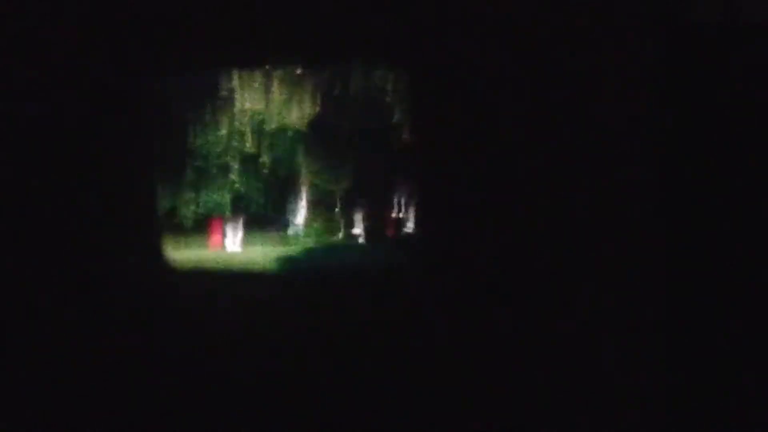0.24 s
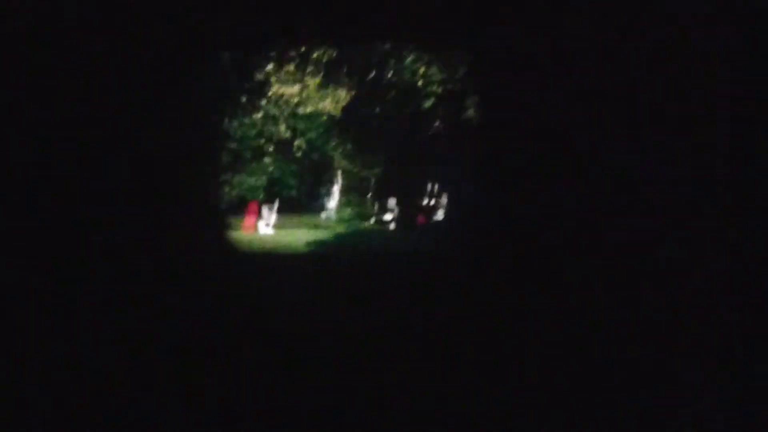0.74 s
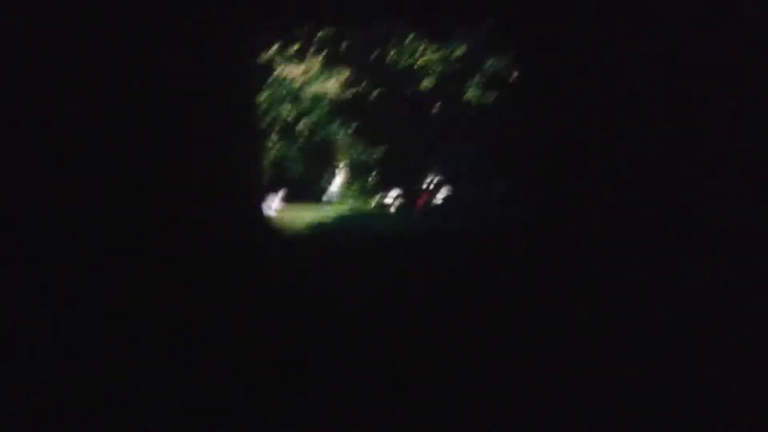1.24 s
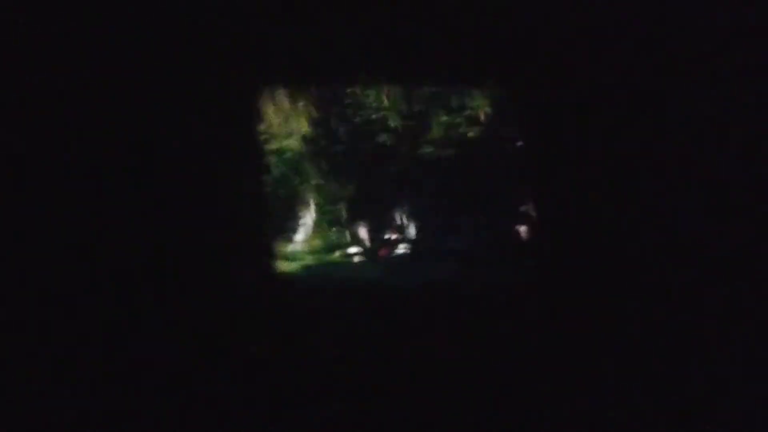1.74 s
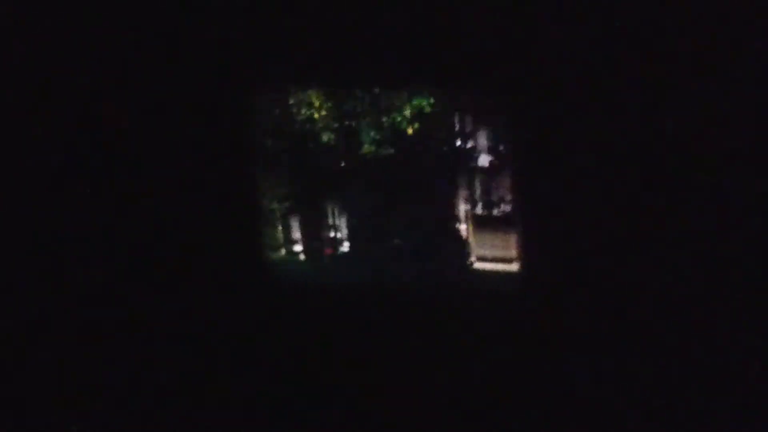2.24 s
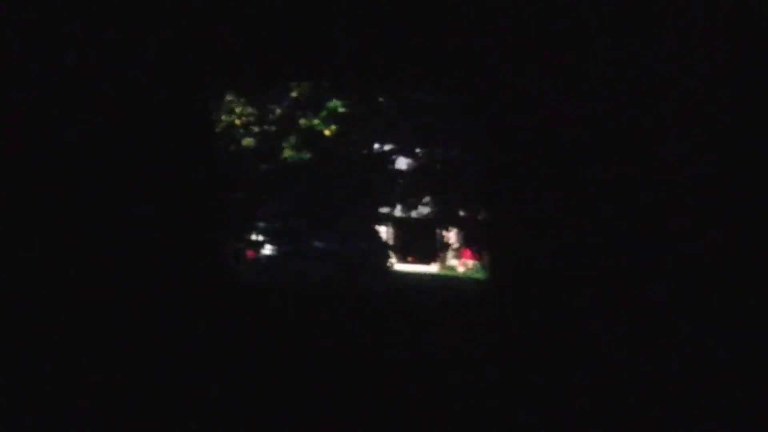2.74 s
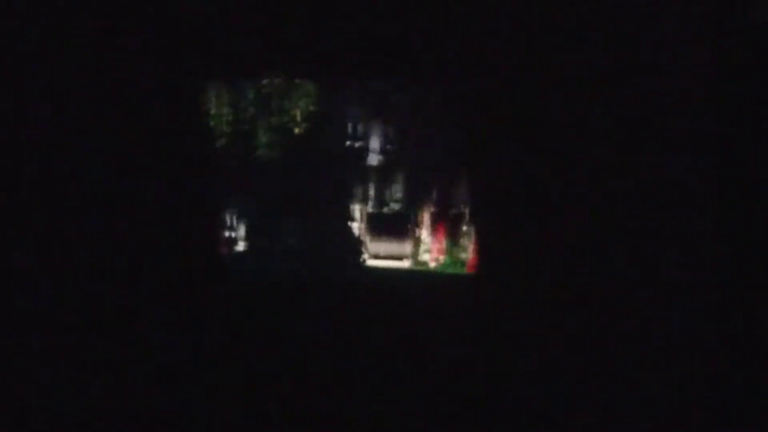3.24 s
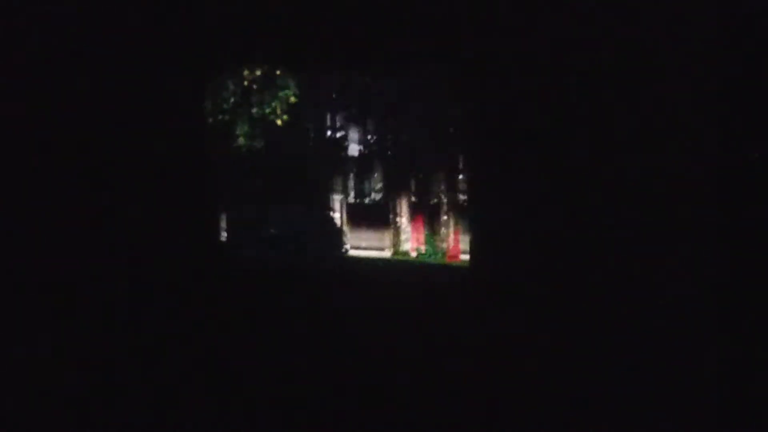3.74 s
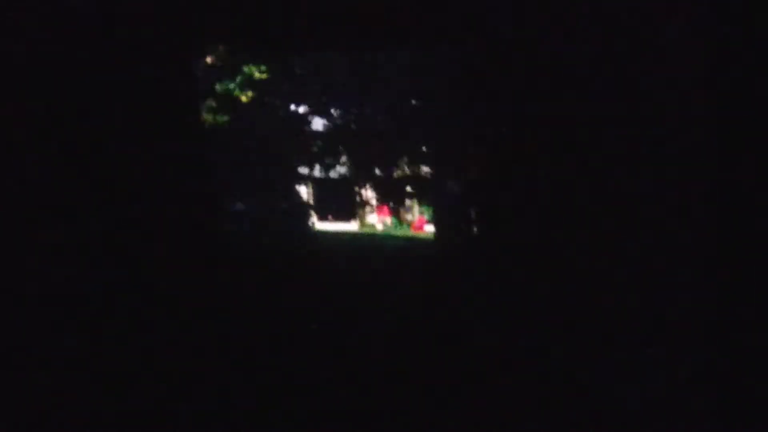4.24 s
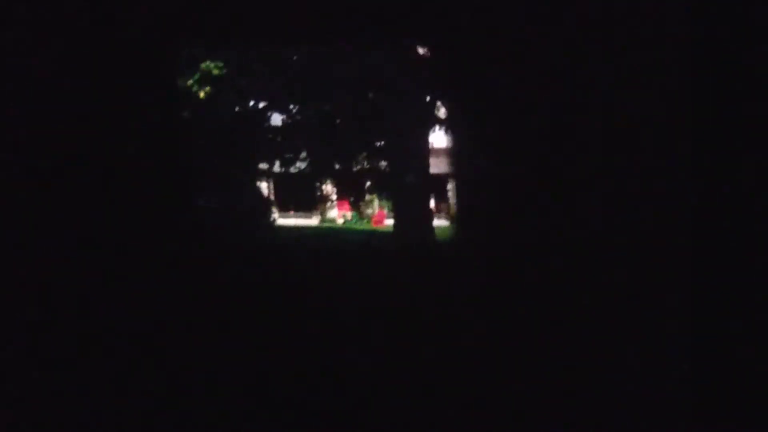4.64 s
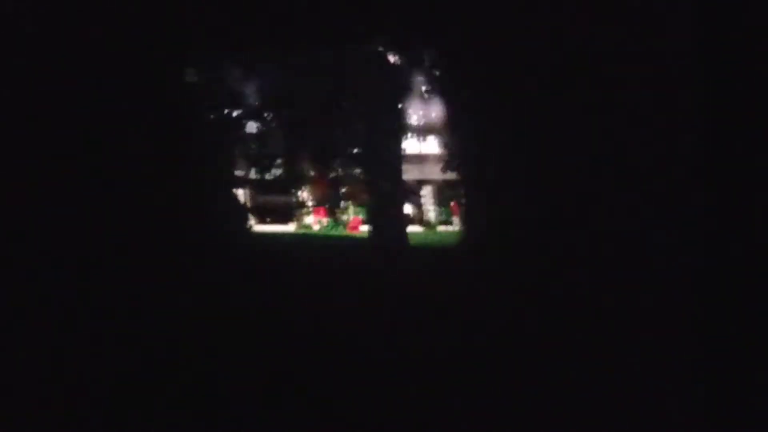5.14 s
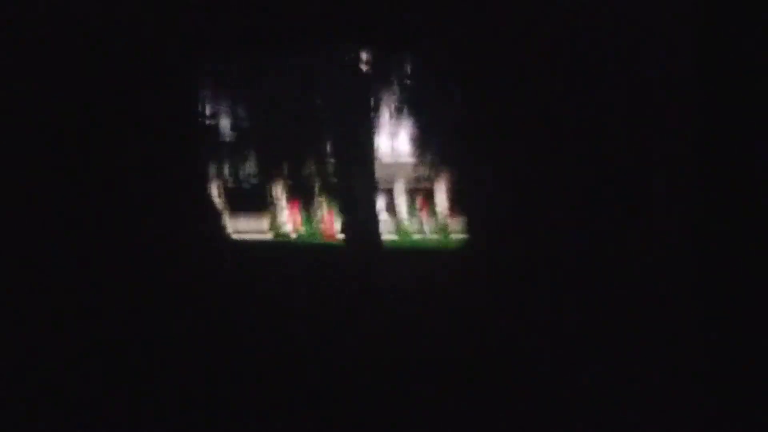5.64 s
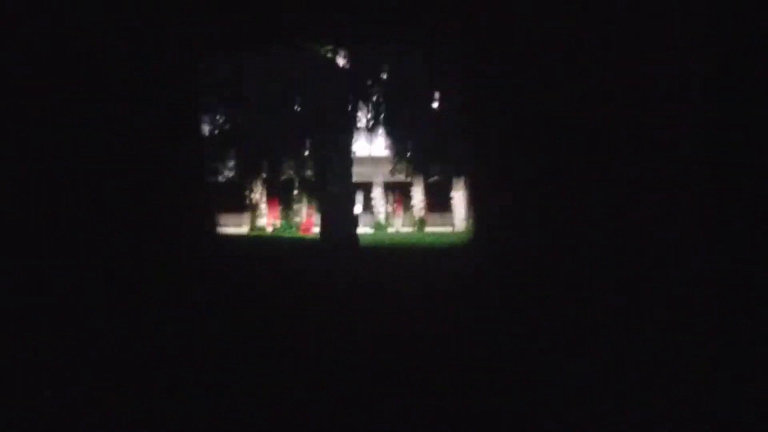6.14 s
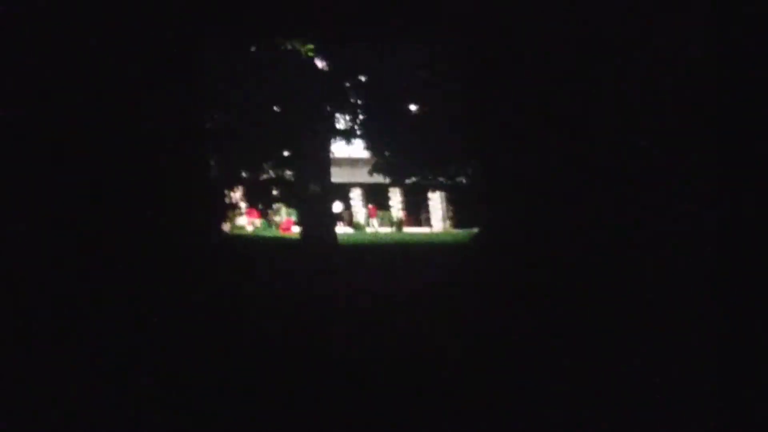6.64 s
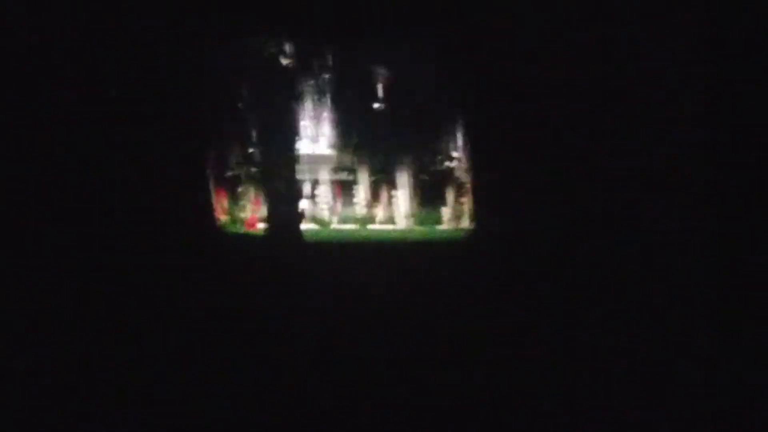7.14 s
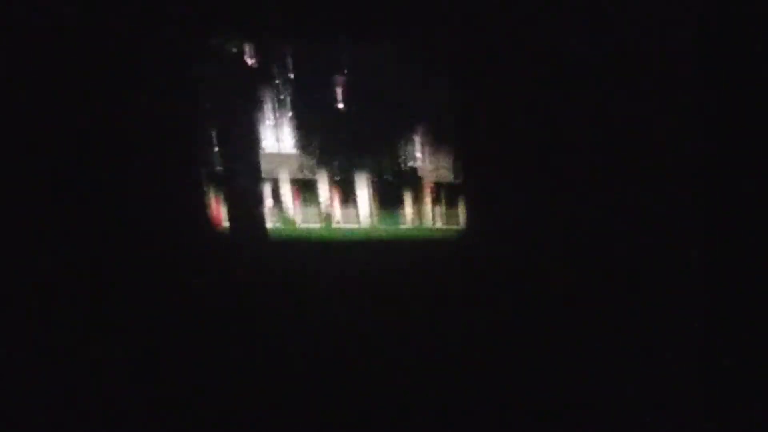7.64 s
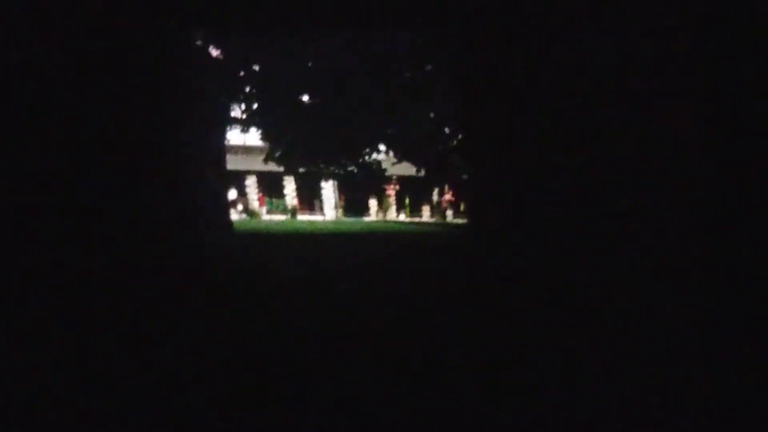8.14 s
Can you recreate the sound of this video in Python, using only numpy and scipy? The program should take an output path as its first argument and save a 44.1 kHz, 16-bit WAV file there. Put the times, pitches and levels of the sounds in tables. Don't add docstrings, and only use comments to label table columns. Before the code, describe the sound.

From 0 to about 8.4 seconds a film projector runs without pause in a dark room, heard close on a hand-held stereo recorder. About fifteen times a second its claw ticks, slams the film down with a hard, bright chatter of a few milliseconds and a rasp of sliding film, then ticks faintly back out. Metal gate plates ring briefly and the small room adds a short tail; strength varies slightly from slam to slam. Underneath, motor hum, a nearly steady gear whine around 930 hertz, fan air and fine bright whirr fill the gaps. Fast automatic gain dips under each slam. From roughly 3.4 to 4.3 seconds the recorder turns and the right channel's treble grows duller, while the left stays bright; at 3.8 seconds a finger makes one soft low thud on the case. The same clatter continues to the end, without slowing.

```python
import sys
import numpy as np
from scipy import signal
from scipy.fft import rfft, irfft
from scipy.io import wavfile
from scipy.ndimage import uniform_filter1d

SR = 44100
rng = np.random.default_rng(int(sys.argv[2]) if len(sys.argv) > 2 else 0)


def ratio_of_db(decibels):
    return 10 ** (np.asarray(decibels, float) / 20)


def pcm_store(signal):
    levels = np.round(np.clip(np.atleast_2d(signal), -1, 1) * 32767)
    wavfile.write(sys.argv[1], SR, levels.astype(np.int16).T)


N = 370440

# t/s, level/dB
SHADOW = [
    (0, 1),
    (1.9, 1),
    (3.4, -1),
    (3.9, -5),
    (4.3, -13),
    (8.4, -13),
]
# t/s, f/Hz
WHINE = [(0, 928.73), (.5, 923.78), (1, 931.59), (1.6, 932.58), (2.2, 927.89), (2.9, 928.77), (3.6, 931.34),
         (4.4, 930.31), (5.1, 929.95), (5.8, 934.58), (6.5, 936.07), (7.2, 933.85), (7.8, 936.23),
         (8.4, 936.59)]
RIGHT_LAG_MS = 0.33


def in_time(rows):
    return np.interp(np.arange(N) / SR, *np.transpose(rows))


def table_at(rows, hz):
    at, *columns = np.transpose(rows)
    return np.array([np.interp(np.log(hz + 1), np.log(at), column) for column in columns])


def drift(rate, count):
    r = np.exp(-80 * np.pi * rate / SR)
    noise = rng.standard_normal((count, N // 40 + 2002))
    slow = signal.lfilter([1], [1, -2 * r, r * r], noise)[:, 2000:]
    return np.array([np.interp(np.arange(N) / 40, np.arange(len(s)), s / s.std()) for s in slow])


def coloured(x, db):
    return irfft(rfft(x) * ratio_of_db(db), N)


def treble(x):
    return x - signal.lfilter(*signal.butter(2, 5500, fs=SR), x)


def partly_shared(pair, alike):
    alike = np.clip(alike, 0, 1)
    return np.array([pair[0], np.sqrt(alike) * pair[0] + np.sqrt(1 - alike) * pair[1]])


def arrives_late(x):
    return np.roll(x, round(RIGHT_LAG_MS * SR / 1000))


def room_tail(source):
    t60_s = 0.22
    t = np.arange(int(0.4 * SR)) / SR
    tail = rng.standard_normal((2, len(t))) * ratio_of_db(-60 * t / t60_s)
    tail = tail / np.linalg.norm(tail, axis=1, keepdims=True)
    return signal.fftconvolve(source, tail, axes=1)[:, :N]


def fan(hz):
    # f/Hz, level/dB per Hz, left minus right/dB, coherence/0-1
    casing = [(29.8, -99, -2, 0.5), (57.7, -82.5, 0, 0.4), (109.83, -80, 2, 0.95), (173, -77.5, -1, 0.93),
              (267, -69.5, 2, 1), (342, -71.5, 3, 0.95), (462, -65, -3, 1), (546, -70.5, 3.5, 0.46),
              (756, -71.5, 3, 0.83), (864, -70, -12, 0), (1097, -67.5, 5, 0), (1218, -77.5, -6, 0.75),
              (1576, -69, -0.5, 0.74), (1760, -68.5, -1.5, 1), (2560, -80, 15, 0.9)]
    db, tilt_db, alike = table_at(casing, hz)
    alike = np.clip(alike, 0, 1)
    shared, *own = rfft(rng.standard_normal((3, N)))
    late = np.exp(-2j * np.pi * hz * RIGHT_LAG_MS / 1000)
    both = np.sqrt(alike) * shared * [np.ones_like(late), late]
    both = both + np.sqrt(1 - alike) * np.array(own)
    steep_db = -30 * np.log2(np.maximum(hz / casing[-1][0], 1))
    gain = ratio_of_db(db + steep_db + tilt_db * [[0.5], [-0.5]])
    return irfft(both * gain, N) * np.sqrt(SR / 2)


def motor():
    # share of whine pitch, left level/dB, right level/dB, left lead/rad, wobble/dB
    tones = [(0.1582, -55.5, -59, -0.17, 1.5), (.3168, -46.5, -48, 0.22, 2), (0.3973, -55, -55, -0.4, -1),
             (.495, -51.5, -53.5, -0.5, 3), (0.4784, -61, -63, 0, 6), (0.5529, -55.5, -54.5, -1.1, -0.5),
             (0.6341, -45, -44.5, 0.9, 0), (.8725, -40.5, -44.5, -2.5, 0.2), (.922, -56.5, -60, 2.5, 13),
             (1, -39.5, -44, 1.2, 0.5), (.258, -59, -61, -1, 1), (.761, -56.5, -59.5, 1, 1.5),
             (1.399, -58.5, -64, 1.5, 5), (1.614, -59, -61, 0, 3), (1.7427, -55, -55, -0.5, 3)]
    turn = 2 * np.pi * np.cumsum(in_time(WHINE)) / SR
    wobble, out = drift(rate=3.5, count=len(tones)), 0
    for (share, l_db, r_db, lead, wobble_db), w in zip(tones, wobble):
        height = np.sqrt(2) * ratio_of_db(np.clip(wobble_db, 0, 3) * w + [[l_db], [r_db]])
        out = out + height * np.sin(share * turn - [[0], [lead]])
    return out


def whirr(hz):
    # f/Hz, left level/dB per Hz, right level/dB per Hz
    gear_colour = [(1300, -70, -66), (2030, -78, -69), (2460, -77, -62), (2920, -71.5, -65.5),
                   (4500, -74.5, -69), (5600, -71.5, -69.5), (7100, -70.5, -70.5), (8200, -68.5, -64.5),
                   (8800, -74, -72), (10400, -68.5, -75), (12300, -69, -74), (13300, -69, -68),
                   (14300, -73, -97), (15600, -66, -66)]
    grains = rng.standard_normal((2, N)) * ratio_of_db(drift(rate=76, count=2))
    grains = partly_shared(grains, 0.037)
    ports = [grains[0], arrives_late(grains[1])]
    noise = coloured(ports, table_at(gear_colour, hz) - 1.5) * np.sqrt(SR / 2)
    noise = signal.sosfilt(signal.butter(4, 1900, "high", fs=SR, output="sos"), noise)
    shade_db, bright = in_time(SHADOW), treble(noise[1])
    middle = ratio_of_db(0.18 * shade_db) * (noise[1] - bright)
    return np.array([noise[0], middle + ratio_of_db(shade_db) * bright])


def bump():
    # t/s, level/dB, f/Hz, rise/s
    thuds = [
        (3.82, -46, 75, 0.0092),
    ]
    out = 0
    for s, db, hz, rise_s in thuds:
        t = np.maximum(np.arange(N) / SR - s, 0)
        out = out + ratio_of_db(db) * np.sin(2 * np.pi * hz * t) * t / rise_s * np.exp(1 - t / rise_s)
    return out


def slams():
    first_slam_s, count, whine_cycles_per_frame = 0.0141, 129, 60.57
    left_db, right_db, scatter_db = -12, -12.5, 1.14
    frames = np.cumsum(in_time(WHINE)) / SR / whine_cycles_per_frame
    first = frames[int(first_slam_s * SR)]
    s = np.interp(first + np.arange(count), frames, np.arange(N) / SR)
    chance = scatter_db * rng.standard_normal((len(s), 2))
    return s, left_db + chance[:, 0], right_db + chance[:, 1]


def knocks(at, db, frames_per_turn, fresh):
    fade = ratio_of_db(-60 * np.arange(160) / SR / 0.0038)
    first, second = rng.standard_normal((2, at.shape[1], 160))
    angle = (2 * np.pi * np.arange(len(at)) / frames_per_turn)[:, None, None]
    shape = np.cos(angle) * first + np.sin(angle) * second
    shape = shape + fresh * rng.standard_normal((*at.shape, 160))
    shape[..., 0] = 1.44
    pulses = ratio_of_db(db)[..., None] * shape * fade / np.linalg.norm(fade)
    out = np.zeros(N + 160)
    np.add.at(out, at[..., None] + np.arange(160), pulses)
    return out[:N]


def ring(force, hz, t60):
    r, w = ratio_of_db(-60 / (t60 * SR)), 2 * np.pi * hz / SR
    return signal.lfilter([0, np.sin(w)], [1, -2 * r * np.cos(w), r * r], force + 1e-18)


def claw(hz):
    # t after the slam/ms, level/dB, timing scatter/ms
    contacts = [(-3, -11, .3), (0.4, -1, .15), (0.96, -3, .2), (2.2, -2.5, .2), (2.5, -11.5, .25),
                (4, -5, .3), (5, -10.5, .4), (7, -2, 0.58), (7.5, -11, .6), (10, -14, 0.88), (34, -17, .6),
                (34, -26, 0.98)]
    # t after the slam/ms, level/dB
    sliding = [
        (-12, -40),
        (-0.5, -29),
        (2.5, -7.5),
        (4.5, -8.5),
        (12.5, -29),
        (16, -30),
        (31.5, -27),
        (45, -36.5),
        (62, -30.5),
    ]
    # f/Hz, left level/dB per Hz, right level/dB per Hz
    claw_colour = [(1320, -44, -46.5), (2066, -64.5, -68), (2417, -47, -50.5), (2960, -57, -47.5),
                   (4500, -56, -47.5), (4520, -52.5, -50.5), (5920, -59, -50.5), (7250, -51, -45.5),
                   (7890, -50, -44), (8330, -54.5, -47.5), (11330, -47.5, -49), (12540, -42.5, -55),
                   (12900, -40.5, -52), (14600, -47, -44), (15600, -56, -51.5)]
    # f/Hz, left level/dB, right level/dB, t60/s
    plates = [(2307, -27, -23, 0.012), (2436, -42, -8, 0.019), (2963, -32, -19.5, 0.03),
              (3400, -24, -20.5, 0.037), (3844, -29, -39, 0.071), (8400, -39, -15, 0.016),
              (9730, -20, -18.5, 0.0085), (11900, -22, -15, .012), (13950, -31, -13, .008)]
    s, left_db, right_db = slams()

    ms, db, scatter = np.transpose(contacts)
    chance = rng.standard_normal((len(s), 2, len(ms)))
    contact_s = s[:, None] + (ms + scatter * chance[:, 0]) / 1000
    at = np.clip(contact_s * SR, 0, N - 1).astype(int)
    hit_db = db + 1.67 * chance[:, 1]
    hits = np.array([knocks(at, hit_db, frames_per_turn=67.5, fresh=0.5) for port in "LR"])

    t = np.arange(N) / SR
    frame = np.clip(np.searchsorted(s - 0.008, t) - 1, 0, len(s) - 1)
    grit = rng.standard_normal((2, N)) * ratio_of_db(3.13 * np.minimum(rng.exponential(1, N), 5))
    slide = grit * ratio_of_db(np.interp((t - s[frame]) * 1000, *np.transpose(sliding)) - 17.5)

    force = partly_shared(hits + slide, 0.048) * ratio_of_db(np.array([left_db, right_db])[:, frame])
    body = coloured(force, table_at(claw_colour, hz) + 72)
    struck = ratio_of_db(3.5 * rng.standard_normal((len(s), len(plates))))
    for (mode_hz, l_db, r_db, t60), strength in zip(plates, struck.T):
        body = body + ring(force * strength[frame], mode_hz, t60) * ratio_of_db([[l_db + 1.5], [r_db + 0.1]])
    body = signal.sosfilt(signal.butter(6, 1950, "high", fs=SR, output="sos"), body)
    right = body[1] + (ratio_of_db(0.61 * in_time(SHADOW) + 0.5) - 1) * treble(body[1])
    return np.array([body[0], arrives_late(right)])


def scene():
    hz = np.fft.rfftfreq(N, 1 / SR)
    clatter = claw(hz)
    left, right = clatter + ratio_of_db(-13.5) * room_tail(clatter) + whirr(hz)
    left = left + (ratio_of_db(-0.03 * in_time(SHADOW)) - 1) * treble(left)
    return np.array([left, right]) + fan(hz) + motor() + bump()


def roll_off(x):
    return signal.sosfilt(signal.butter(12, 16960, fs=SR, output="sos"), x)


def record(dry):
    level_db = 10 * np.log10(uniform_filter1d(np.sum(dry ** 2, axis=0), size=66) + 1e-12)
    fall_db = 1200 * np.arange(N) / SR
    held_db = np.maximum.accumulate(level_db + fall_db) - fall_db
    duck_db = uniform_filter1d(-0.45 * np.maximum(held_db + 16.5, 0), size=44)
    top_cut = signal.cheby2(28, 45, 15920, fs=SR, output="sos")
    x = signal.sosfilt(top_cut, dry * ratio_of_db(duck_db))
    housing_hz, width_hz, depth = 1940, 84, 0.75
    x = x - depth * signal.lfilter(*signal.iirpeak(housing_hz, housing_hz / width_hz, fs=SR), x)
    return roll_off(np.clip(x, -1, 1))


dry = scene()
out = record(dry)
pcm_store(out)
```